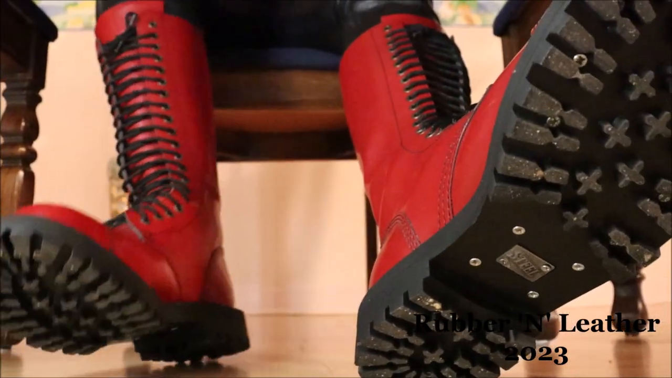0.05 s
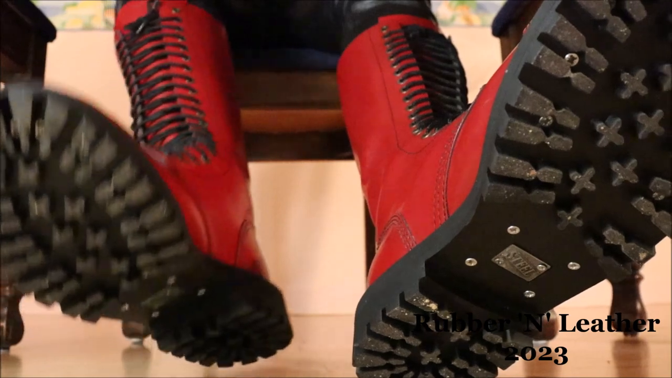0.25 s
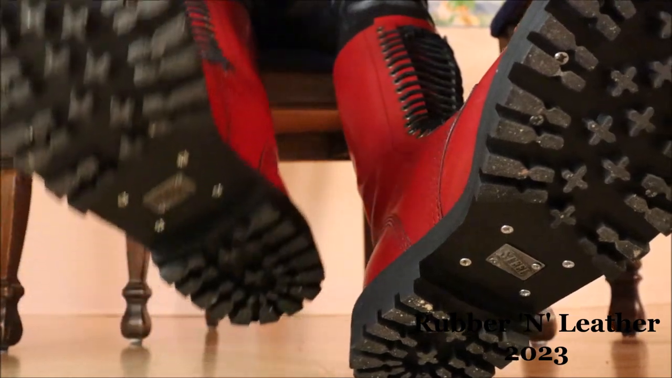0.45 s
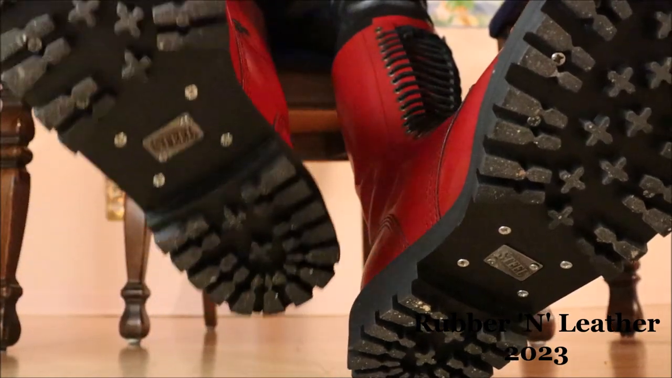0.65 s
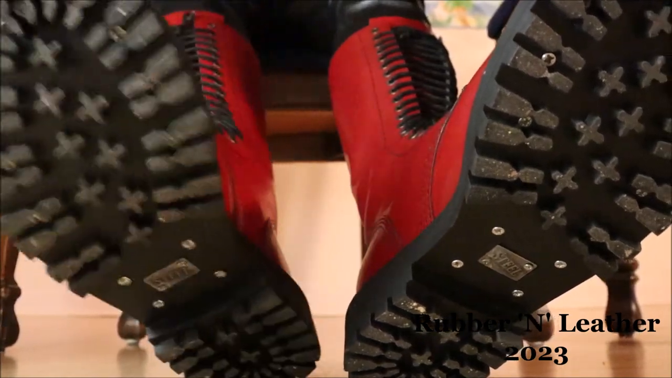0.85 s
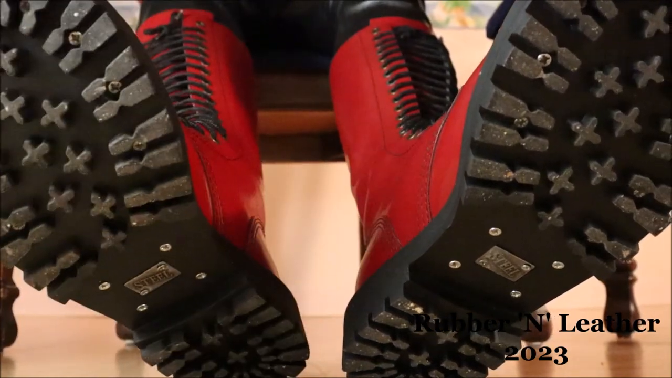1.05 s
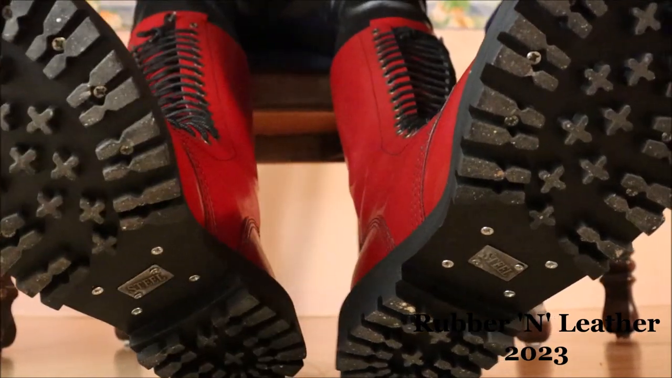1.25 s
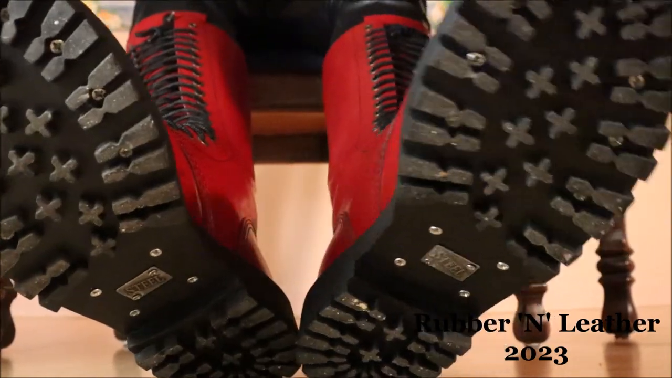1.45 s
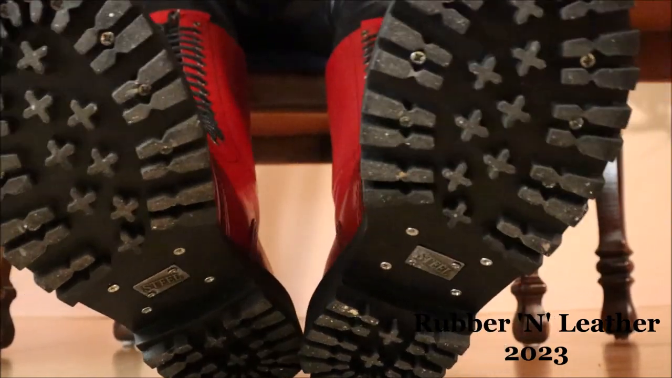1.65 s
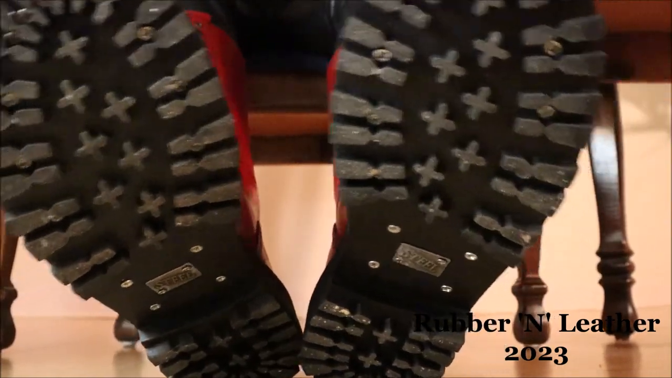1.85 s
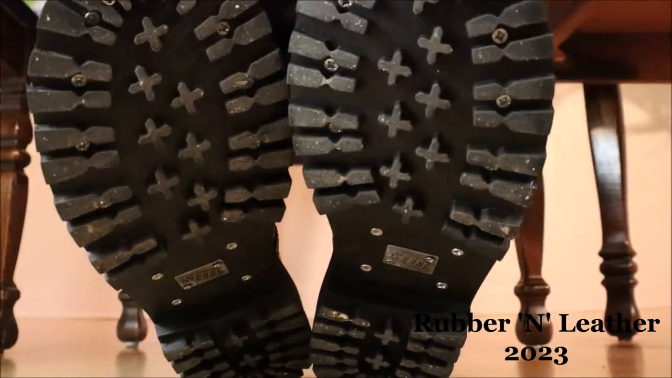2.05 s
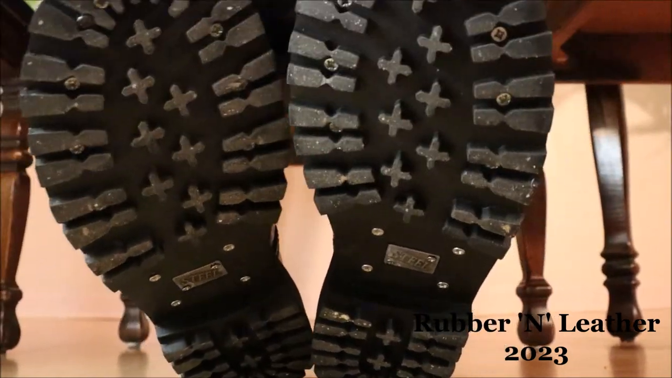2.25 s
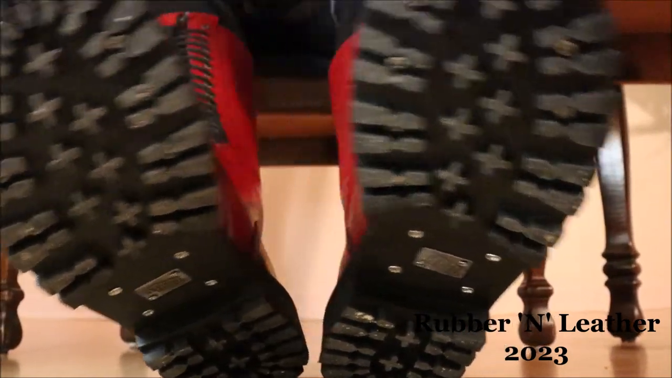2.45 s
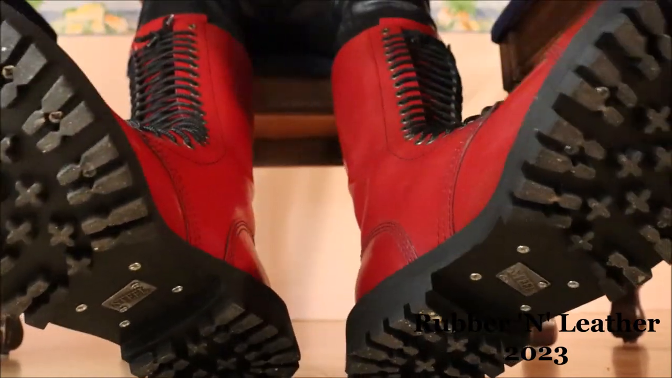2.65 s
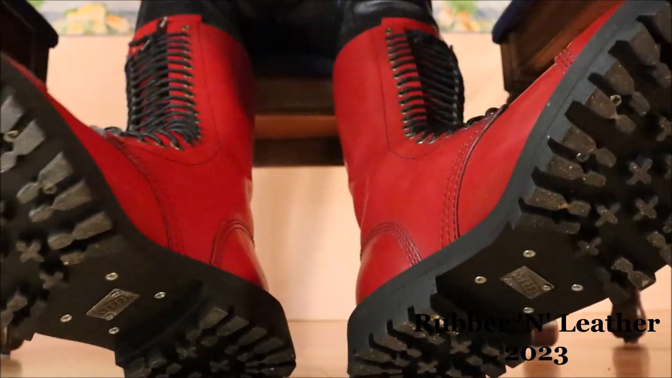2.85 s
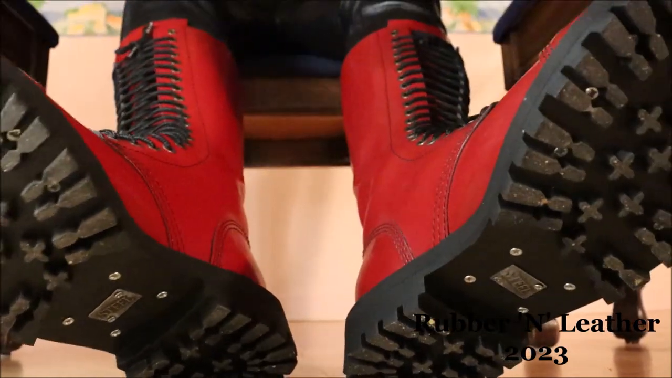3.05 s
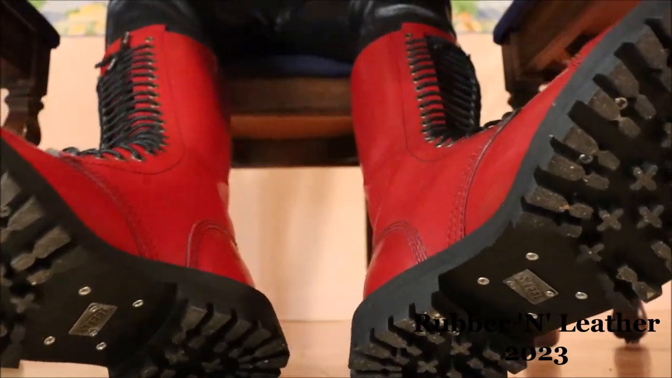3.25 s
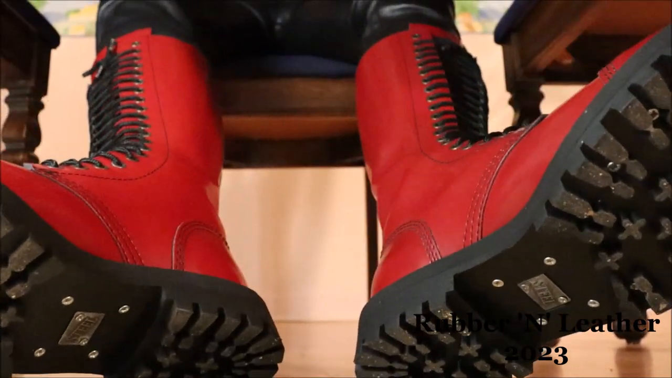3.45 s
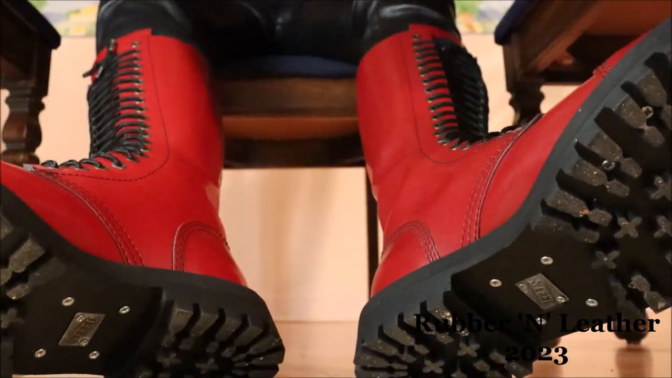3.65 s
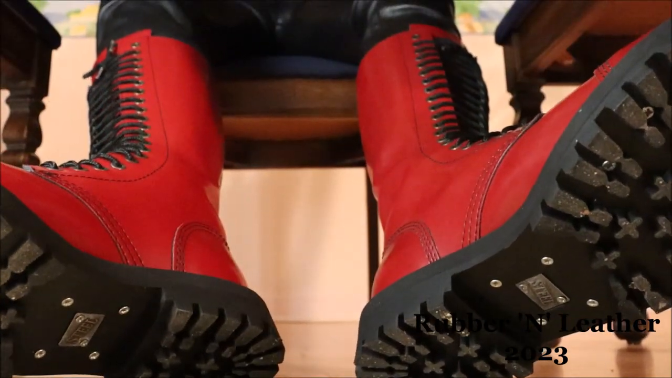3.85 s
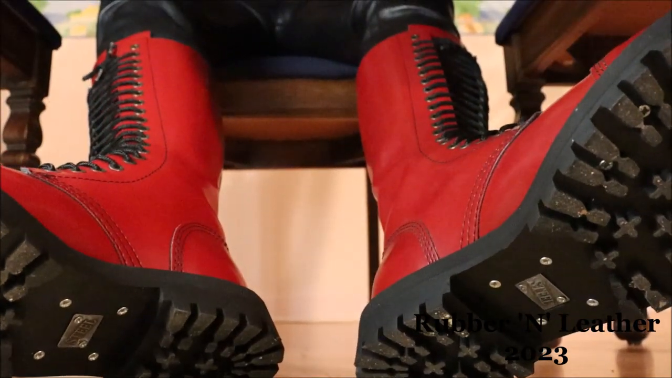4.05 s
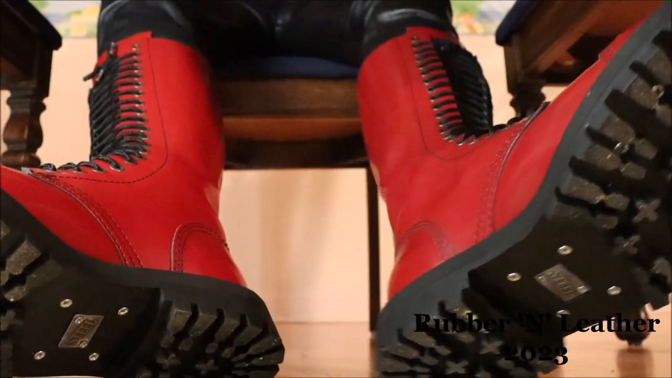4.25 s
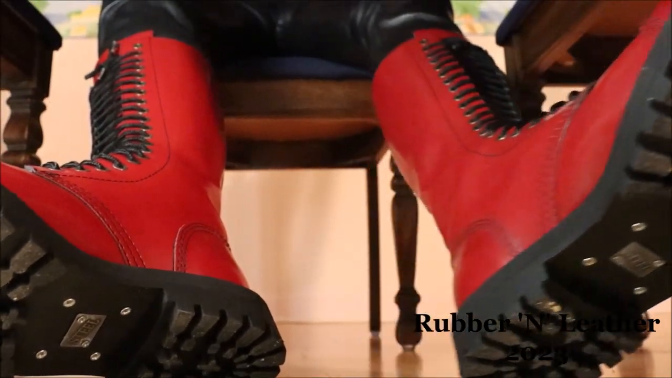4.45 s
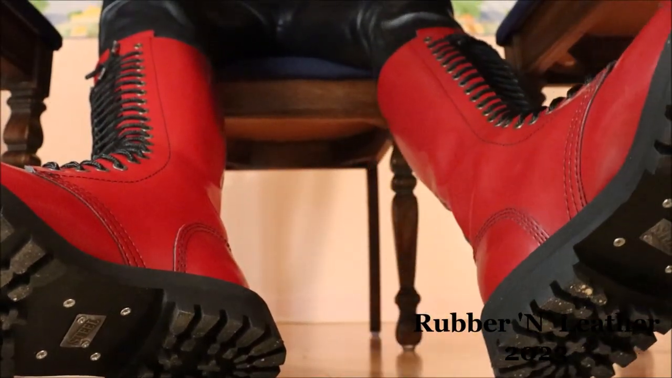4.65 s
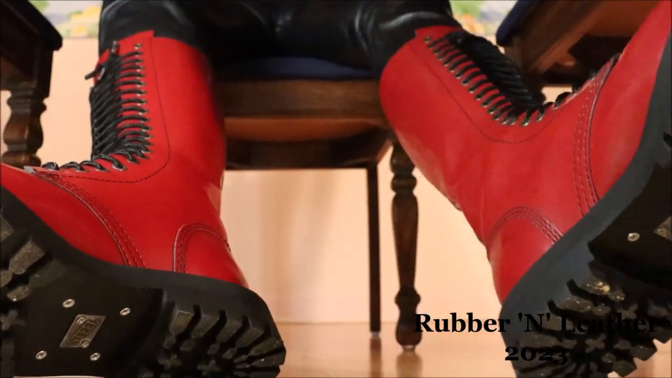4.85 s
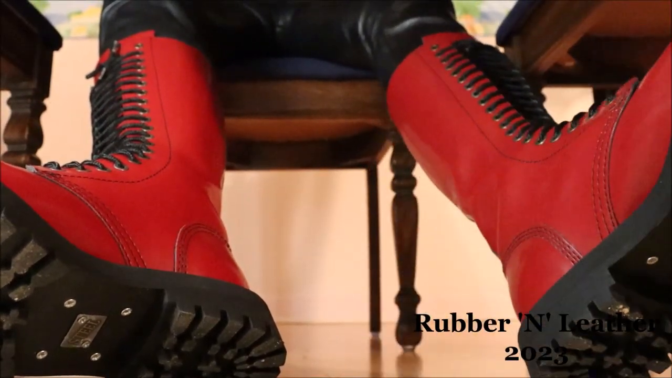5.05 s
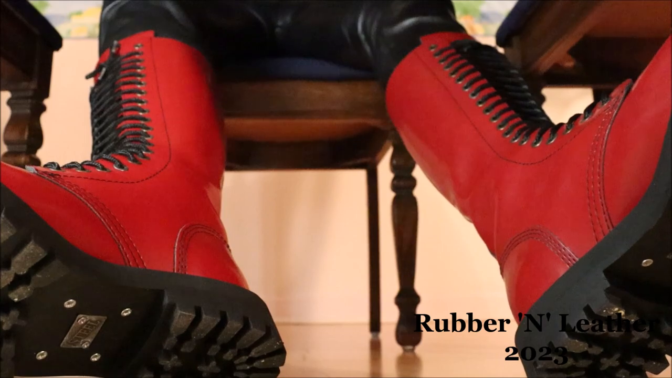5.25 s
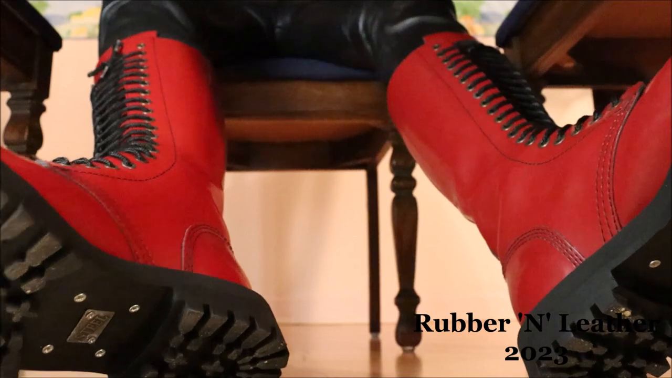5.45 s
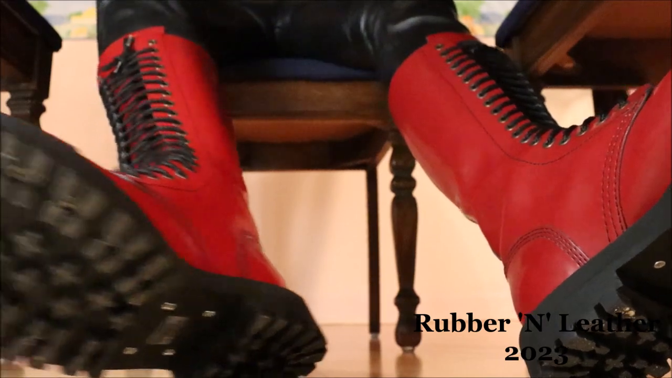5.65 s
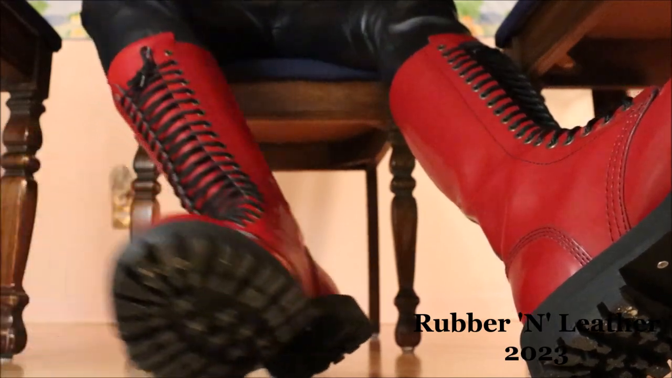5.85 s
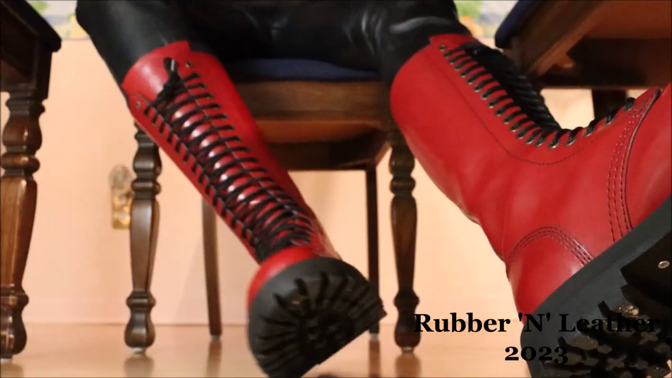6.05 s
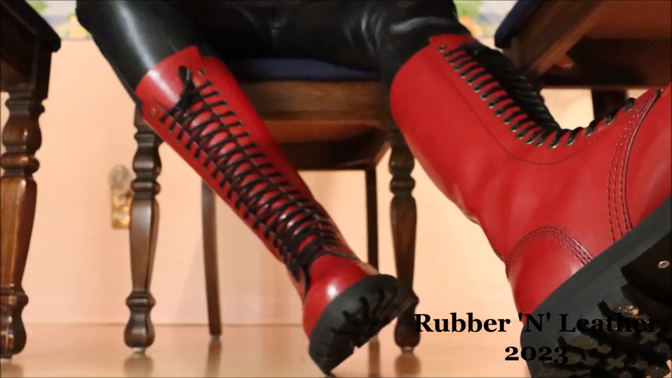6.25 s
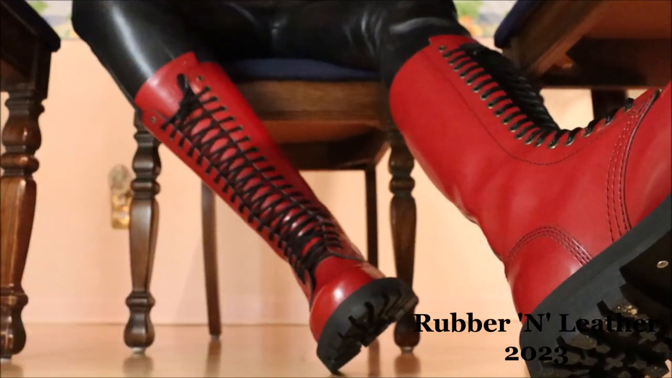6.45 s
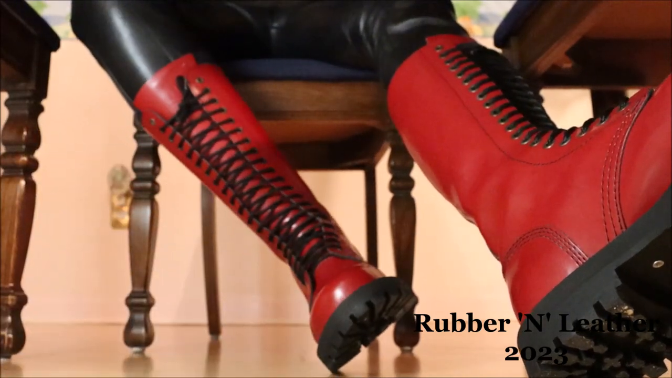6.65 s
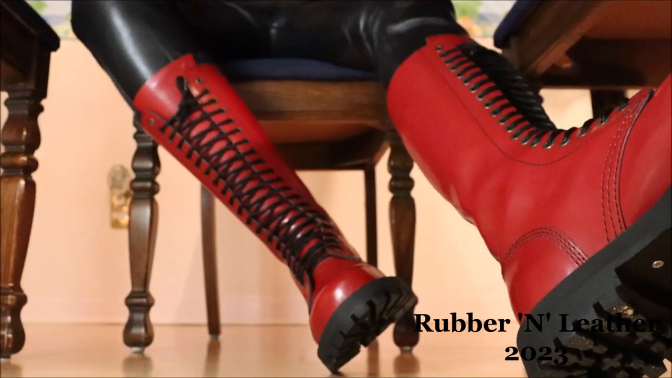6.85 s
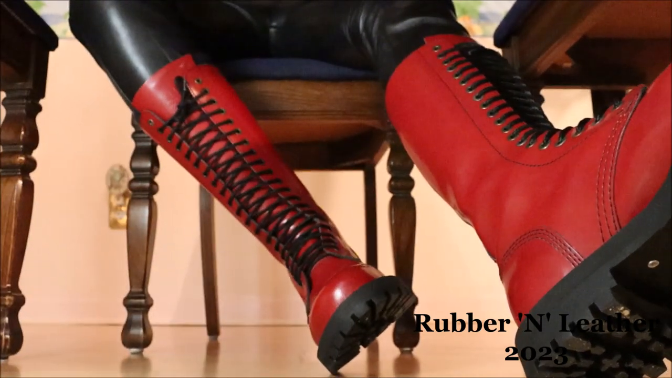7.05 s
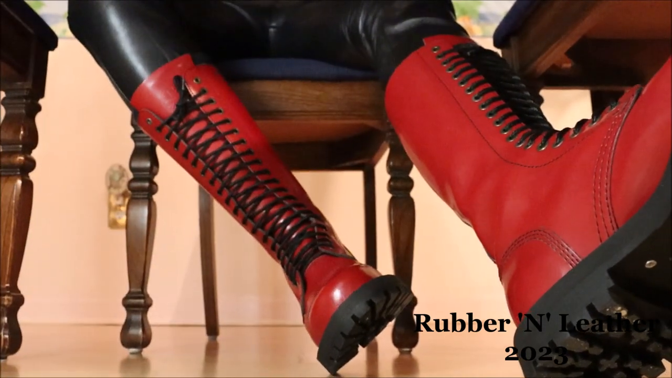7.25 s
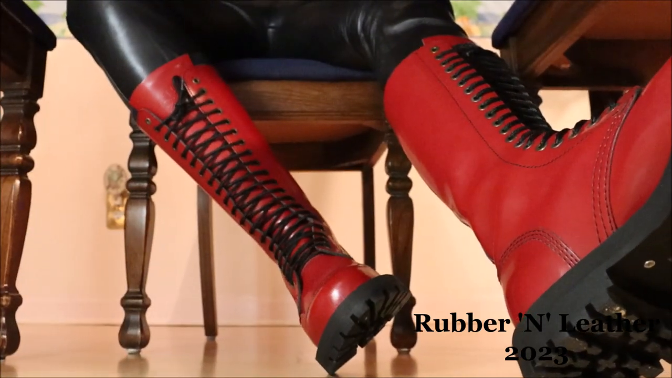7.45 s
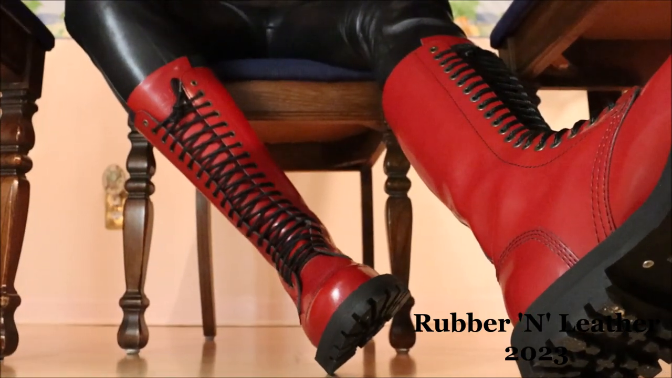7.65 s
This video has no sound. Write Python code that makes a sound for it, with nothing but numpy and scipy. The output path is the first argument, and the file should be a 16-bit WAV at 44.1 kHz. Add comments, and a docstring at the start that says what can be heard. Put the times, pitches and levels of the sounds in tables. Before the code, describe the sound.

Heavy leather boots turn on their heels on wooden boards, close to a small stereo microphone in a room. Rough scraping and leather rustle lead to one hard, hollow heel knock near the first second, followed by crisp ticks. Quiet shifts and soft knocks follow, then a loud harsh scrape with a thud near six seconds, and faint settling ticks over low hiss and hum.

```python
"""Heavy boots turn on their heels on a wooden floor, close to a small stereo microphone, indoors.
Soles, boards and leather slide and rustle: noise shaped stroke by stroke, with added noise bands as rasps.
Heels knock the boards, which ring as decaying modes; cracks and small ticks are noise bursts through resonances.
Knocks and ticks send a short diffuse tail into the room; a faint mains hum and hiss lie beneath."""
import sys
import numpy as np
from scipy import signal
from scipy.fft import rfft, irfft, next_fast_len
from scipy.io import wavfile
from scipy.ndimage import uniform_filter1d, map_coordinates

SR = 44100
rng = np.random.default_rng(int(sys.argv[2]) if len(sys.argv) > 2 else 0)


def output_pcm(signal):
    """Save a mono or channel-first signal as 16-bit PCM at the path in sys.argv[1].

    Samples are clipped to [-1, 1] before scaling.
    """
    pcm = np.clip(np.atleast_2d(signal).T, -1, 1) * 32767
    wavfile.write(sys.argv[1], SR, np.round(pcm).astype(np.int16))


N = 340114  # length in samples
HOP = 128  # step of the short-time spectra, samples


def amp(db):
    """Decibels to gain."""
    return 10 ** (np.asarray(db) / 20)


def unit(x):
    """x at rms 1."""
    return x / np.sqrt(np.mean(np.abs(x) ** 2) + 1e-20)


def along(points, hz):
    """Reads a curve of (hz, value) points on a log frequency axis."""
    point_hz, value = np.transpose(points)
    return np.interp(np.log(hz + 1), np.log(point_hz + 1), value)


def filtered(x, response):
    """x times a complex response of frequency."""
    size = next_fast_len(x.shape[-1] + SR // 2)
    spectrum = rfft(x, size) * response(np.fft.rfftfreq(size, 1 / SR))
    return irfft(spectrum, size)[..., :x.shape[-1]]


def band(x, hz, width):
    """x through one resonance twice, peak 1."""
    y = filtered(x, lambda f: (1j * f * width / (hz * hz - f * f + 1j * f * width)) ** 2)
    return y / np.abs(y).max()


def pair(excitation, alike):
    """Short-time spectra of two channels mixed to the likeness in the table, held between 0 and 1."""
    hz, t, (a, b) = signal.stft(excitation, SR, nperseg=4 * HOP, noverlap=3 * HOP)
    turn = np.arccos(np.clip(along(alike, hz), 0, 1))[:, None] / 2
    left = np.cos(turn) * a + np.sin(turn) * b
    right = np.cos(turn) * a - np.sin(turn) * b
    return hz[:, None], t, np.array([left, right])


def to_samples(spectra):
    """Short-time spectra back to samples."""
    return signal.istft(spectra, SR, nperseg=4 * HOP, noverlap=3 * HOP)[1][:, :N]


def patches(shape, db):
    """Random gain, smooth over some hundred Hz and some ten ms."""
    across_hz = uniform_filter1d(rng.standard_normal(shape), size=3, axis=0)
    field = uniform_filter1d(across_hz, size=10, axis=1)
    return amp(db * unit(field))


def wobble(t, rate):
    """A smooth random curve, rate knots a second."""
    return map_coordinates(rng.standard_normal(int(t[-1] * 60)), [t * rate])


def add(out, start_s, x):
    """Mixes x into out from start_s."""
    part = out[:, round(start_s * SR):][:, :x.shape[1]]
    part += x[:, :part.shape[1]]


def sliding():
    """Dense uneven slips excite sole, boards and leather; the sole's resonance moves as the boot tilts."""
    # likeness of the two ports: hz, left-right likeness (0 to 1)
    alike = [(60, 0.93), (400, 0.91), (1000, 0.56), (2000, 0.55), (4000, 0.43), (8000, 0.24), (15000, 0.13)]
    # balance of the ports: hz, left over right in dB
    leans = [(60, 5), (150, 1), (380, 0), (950, 0), (2380, -3), (5980, -2), (15000, -4.5)]
    # near reflections turn the ports apart: hz, left's lead in radians
    leads = [(300, -0.1), (1700, -0.5), (2240, 1.64), (3000, 1.8), (3600, 0.87), (4390, 1), (5770, 2.5),
             (6900, 0.9), (10300, 2.5), (16000, 1)]
    # steady bands in the scraping sound: centre_hz, width_hz, lift_db
    steady_bands = [(1560, 200, 6.5), (2280, 200, 4), (2860, 130, 5), (3260, 250, 7), (4130, 200, 3)]
    # relative spectra of sole scrape, drag on the boards, leather rustle and fine swish: hz, density in dB
    scrape = [(470, -32), (800, -1.5), (1230, -1), (1330, -1), (1560, -1.5), (2060, 1), (3300, -3),
              (3680, -1.5), (4280, -6), (6000, -52), (7800, -49), (13200, -120)]
    drag = [(29, -46), (50, -19.5), (210, 6.5), (236, 6), (399, -1), (603, 1.5), (886, -5.5), (1340, -9),
            (1500, -6), (1950, -95.5), (3300, -120)]
    rustle = [(2650, -22), (4500, -2.5), (4700, -5), (5610, -5.5), (6980, -8.5), (8050, -12), (10500, -23),
              (13600, -30), (22000, -120)]
    swish = [(5000, -48), (8500, -7), (10700, -6), (12800, -5), (13900, -4.5), (16000, -5.5)]

    slip_size = amp(4 * rng.standard_normal(N)) * (rng.random(N) < .2)  # one sample in five slips
    slip_gain = unit(np.hypot(.9, unit(slip_size)))
    hz, t, z = pair(rng.standard_normal((2, N)) * slip_gain, alike)
    centre_hz, scrape_db, drag_db, rustle_db, swish_db = strokes(t)

    moving_resonance = np.sqrt(0.32 + 1.42 / (1 + ((hz - centre_hz) / 350) ** 2))
    lift_db = sum(db / (1 + (2 * (hz - c) / width) ** 2) for c, width, db in steady_bands)
    sole = amp(along(scrape, hz)) * moving_resonance * amp(lift_db)
    sole /= np.sqrt(np.mean(sole ** 2, axis=0))
    power = (amp(scrape_db) * sole) ** 2
    for db, spectrum in ((drag_db, drag), (rustle_db, rustle), (swish_db, swish)):
        power += (amp(db) * unit(amp(along(spectrum, hz)))) ** 2

    strength = np.sqrt(power * patches(power.shape, db=3.5) + rasps(hz, t))
    half = amp(along(leans, hz) / 2) * np.exp(.5j * along(leads, hz))  # each port takes half of the offset
    return to_samples(z * strength * np.array([half, 1 / half]))


def strokes(t):
    """Sole resonance and the levels of the four layers; each stroke rises, holds and falls."""
    # slides, turns and the rumble after the big knock: full_strength_from_s, rise_s, hold_s, fall_s,
    # sole_resonance_hz, then scrape_db, drag_db, rustle_db, swish_db (before the uneven grip)
    stroke_rows = [(0, .05, .21, 0.069, 2700, -46, -53.5, -55.5, -57.5),
                   (.3, .15, .05, .15, 1640, -56, -50.5, -67, -60),
                   (0.383, 0.094, 0.12, 0.23, 2380, -48.5, -51.5, -47.5, -53.5),
                   (0.591, 0.095, 0.15, 0.15, 1750, -44.5, -47.5, -49, -54),
                   (0.804, 0.082, 0.077, 0.11, 1900, -48.5, -50, -52, -59),
                   (0.928, 0.095, 0.15, 0.35, 2220, -58, -47, -86, -75),
                   (1.312, 0.13, 0.027, 0.095, 2010, -59.5, -57, -67, -86),
                   (1.55, .13, 0.016, .24, 1780, -55.5, -53, -65, -68),
                   (1.955, 0.13, 0.066, 0.23, 2000, -57.5, -54.5, -66, -67),
                   (2.515, 0.12, 0.27, 0.14, 1840, -58.5, -58, -66.5, -67),
                   (2.983, 0.22, 0.045, 0.43, 1650, -58, -61.5, -66, -66),
                   (3.292, 0.3, 0.072, .15, 1920, -60.5, -57.5, -65, -64),
                   (3.46, 0.093, .04, 0.1, 1620, -60, -50.5, -66, -67),
                   (3.94, 0.066, 0.014, 0.17, 1710, -57, -62, -76, -72),
                   (4.3, 0.11, .13, 0.071, 3300, -54, -58, -59.5, -60.5),
                   (4.5, 0.18, 0.036, 0.23, 1900, -56.5, -56, -69, -67),
                   (4.806, 0.077, 0.14, 0.12, 1870, -62, -65.5, -69, -69),
                   (5.256, 0.1, 0.016, 0.059, 1700, -69, -68, -75, -80),
                   (5.62, 0.033, .07, 0.14, 2520, -60, -52, -62, -60),
                   (5.76, 0.15, 0.41, 0.19, 3080, -38, -50, -48.5, -55.5),
                   (5.999, 0.037, 0.028, .06, 2950, -36.5, -44, -54, -61),
                   (6.267, 0.078, 0.067, 0.14, 2750, -42, -51, -54.5, -53.5),
                   (6.531, 0.2, 0.039, 0.12, 1830, -53.5, -49, -62.5, -64),
                   (7.04, 0.23, 0.12, 0.23, 1670, -61.5, -63.5, -68, -71),
                   (7.308, 0.2, 0.13, 0.25, 1850, -66, -63, -71, -70),
                   (7.705, 0.097, .1, .1, 1890, -48.5, -56.5, -61, -62)]
    # the boots never lie quite still: sole_resonance_hz, scrape_db, drag_db, rustle_db, swish_db
    resting = (2000, -72, -67.5, -74.5, -72)
    fade_db = 15  # drop over the rise time and over the fall time, in dB
    grip_db, grip_rate = 1.34, 30  # uneven grip: level swing in dB, knots a second
    tilt_share, tilt_rate = 0.069, 12  # wander of the resonance: share (log), knots a second

    rows = np.array(stroke_rows)
    start, rise, hold, fall = rows[:, :4].T[:, :, None]
    before = np.maximum(start - t, 0) / rise
    after = np.maximum(t - start - hold, 0) / fall
    shape_db = -fade_db * (before + after)
    power = amp(2 * (rows[:, 5:].T[:, :, None] + shape_db))
    rest = amp(2 * np.array(resting[1:]))
    total = power.sum(axis=1) + rest[:, None]
    # the resonance follows whichever stroke scrapes loudest
    centre_hz = (rows[:, 4] @ power[0] + resting[0] * rest[0]) / total[0]
    levels_db = 10 * np.log10(total) + grip_db * wobble(t, grip_rate)
    return centre_hz * np.exp(tilt_share * wobble(t, tilt_rate)), *levels_db


def rasps(hz, t):
    """Power of a lug or seam under load: noise bands that start within 5 ms and stop within some ms."""
    # narrow or broad noise bands, steady or gliding, brief or held through a slide:
    # start_s, end_s, first_hz, last_hz, width_hz, level_db,
    # left over right in dB (ahead of the balance of all sliding)
    rasp_rows = [(0.596, 0.747, 1740, 1700, 490, -42.5, 1.5), (.75, 0.86, 1700, 1700, 500, -50.5, 1.5),
                 (5.8, 6.37, 6900, 7100, 1100, -56.5, -1), (0.58, 0.772, 2900, 2920, 620, -44.5, 1),
                 (2.03, 2.404, 2330, 2080, 260, -64.5, 7), (2.943, 3.056, 1600, 1660, 400, -55, 0),
                 (2.94, 3.054, 5300, 2400, 2500, -56.5, 0), (3.46, 3.485, 2000, 1300, 190, -53, 0),
                 (5.903, 5.936, 3500, 3000, 1900, -40, -11), (3.91, 3.95, 1600, 1200, 3200, -52.5, -1)]
    power = 0
    for start, end, first_hz, last_hz, width, db, pan_db in rasp_rows:
        centre = np.interp(t, [start, end], [first_hz, last_hz])
        shape = 1 / (1 + (2 * (hz - centre) / width) ** 4)
        opening = np.clip((t - start) / 0.0046, 0, 1)
        closing = np.clip((end - t) / 0.019 + 1, 0, 1)
        sides = amp([[[pan_db]], [[-pan_db]]])  # on power: half of pan_db at each port
        power = power + sides * (amp(db) * opening * closing) ** 2 * shape / shape.mean(axis=0)
    return power


def knocks():
    """The patch under the heel rings briefly and sets the joists going; only a hard edge wakes the upper modes."""
    # heel on boards: start_s, direct peak_db (mean of the ports), heel_hz,
    # then boom_db of the joists, hardness_db of the edge, weight_db of the deep floor
    knock_rows = [(0.921, -6, 293, -6.5, -12, -25), (1.474, -34, 134.6, -11.5, -18, -22.5),
                  (1.648, -22, 199, -6.5, -12.5, -25), (2.054, -32, 115, -10.5, -9.5, -20.5),
                  (2.31, -46.5, 480, -1, -3, -19), (2.461, -45, 620, -9, -6, -28),
                  (2.505, -42, 163, -1, -6, -25), (3.322, -41.5, 151, -2, -11, -24),
                  (3.412, -36.5, 520, 2.5, -2, -15), (3.511, -38, 240, -9, -22, -44),
                  (3.904, -40, 160, 2, -4.5, -23), (4.443, -39.5, 628, -28, -10, -33),
                  (4.575, -39.5, 134, 3, -2, -16), (5.09, -25, 201, -10, -28, -23),
                  (6.001, -23.5, 147, -1, -4.5, -18), (6.46, -39, 228, -14, -21, -40),
                  (6.497, -36, 244, -6.5, -14, -33), (6.525, -36, 229, -9, -4, -20.5),
                  (7.003, -49.5, 605, -6, 3, -23), (7.054, -43.5, 240, -6, -12, -34),
                  (7.133, -36, 252, -11, -7, -37), (7.359, -46, 460, -15, -7, -28),
                  (7.38, -38, 170, 0, -4, -38), (7.671, -40, 167, 9.5, -12, -5)]
    # modes of the struck plank, of the joists and of the whole floor: hz, level_db, t60_s
    plank = [(504, 7.5, 0.041), (642, -5, 0.059), (835, -18, 0.046), (945, -14, 0.032), (1413, -11, 0.017),
             (417.7, -11, 0.36), (504, -14, 0.29), (608, -20, 0.57)]
    joist_modes = [(127, -5.5, 0.53), (172, -1.5, 0.3), (213.5, -5, 0.27), (263.6, -2, 0.17),
                   (321, -10, 0.4)]
    floor_modes = [(38.4, 3.9, 0.77), (69.5, 15.2, 0.3), (98.4, 8.4, 0.56)]

    out, t = np.zeros((2, N)), np.arange(int(.6 * SR)) / SR
    rise = 1 - np.exp(-t / 0.00031)
    for start, db, heel_hz, boom_db, hard_db, weight_db in knock_rows:
        heel = ring([(heel_hz, 0, .07)], t, loose=0)
        edge = amp(hard_db) * ring(plank, t, loose=0.0016)
        joists = amp(boom_db) * ring(joist_modes, t, loose=0.0018) * (1 - np.exp(-t / 0.00044))
        deep = amp(weight_db) * ring(floor_modes, t, loose=0.002) * (1 - np.exp(-t / 0.0084))
        knock = rise * (heel + edge + joists + deep)
        gain = amp(db) / np.abs(knock).max()
        # the knock starts 1.5 ms after its time; the input to its room tail does not
        add(out, start + 0.00147, gain * knock * amp([[.3], [-.3]]))
        add(out, start, amp(-10.0) * room(gain * rise * (heel + edge)))
    return out


def ring(modes, t, loose):
    """Decaying modes of alternating sign at new strengths; loose boards make their phase wander."""
    wander = loose * np.cumsum(rng.standard_normal((len(modes), len(t))), axis=1)
    spot_db = 1.5 * rng.standard_normal(len(modes))
    total = np.zeros(len(t))
    for k, (hz, db, t60) in enumerate(modes):
        decay = amp(db + spot_db[k] - 60 * t / t60)
        total -= (-1) ** k * decay * np.sin(2 * np.pi * hz * t + np.sqrt(hz) * wander[k])
    return total


def ticks():
    """A spike and a dying rasp, shared among three broad resonances of boot and board."""
    # cracks of the knocks, and small ticks of boots and boards: start_s, peak_db of the centre band,
    # centre_hz, t60_s, left over right in dB, thump_db and fizz_db over the centre band
    tick_rows = [(.825, -37, 4000, .02, 0, -5, -21), (.857, -34, 5500, 0.01, -8, -15, -14),
                 (0.9197, -18, 1770, 0.034, -5.5, -5.5, -20), (1.143, -24.5, 4000, 0.012, -5.5, -16, -19),
                 (1.1605, -34, 3430, 0.024, -10, -26, -26), (1.2265, -40, 2600, 0.048, 5, -12, -3),
                 (1.2562, -26.5, 3700, 0.019, -5, -31, -11), (1.476, -46, 1500, .02, -1.5, 6, -13),
                 (1.484, -32, 2770, 0.027, -3, -2.5, -2.5), (1.6476, -53, 1410, .033, -2, 18.5, -15),
                 (1.825, -59.5, 2000, 0.03, 1, 17.5, -9), (2.0562, -54.5, 2020, .026, -3, 17, -11),
                 (2.4955, -30.5, 2720, .015, -1.5, -7, -21), (2.771, -44.5, 1450, .043, -1, 5, -15),
                 (2.814, -39.5, 1310, 0.019, -2.5, -17, -28), (2.8673, -40.5, 2080, .026, -1, -15, -22),
                 (2.939, -32, 2800, 0.019, -1, -14, -32), (3.326, -50, 1200, 0.039, -1.5, 8, -18),
                 (3.414, -47, 1300, 0.033, -1.5, 6, -18), (3.459, -36, 1420, 0.083, -2, 0, -23),
                 (3.907, -31, 1500, 0.081, -2, -6, -20), (4.2278, -44.5, 2440, 0.049, 2, -18, -19),
                 (4.4457, -35, 2800, .053, -5, -4, -17), (4.798, -48, 2090, .03, -2, 3, -13),
                 (5.0923, -48, 2780, .033, -17, -1, -12), (6.3567, -33, 2410, 0.055, -2, -4, -13),
                 (6.4027, -35, 1160, 0.067, -3, 0, -4), (6.4455, -38, 1970, 0.029, -1.5, -1, 0.5),
                 (6.473, -38, 2980, 0.031, -2.5, 0, -2), (6.527, -48, 1380, .03, 1.5, 16, -21),
                 (6.769, -34.5, 1940, 0.028, -1, -5, -11), (6.948, -48, 2470, .03, -3, -21, -7),
                 (7.005, -42.5, 3070, .03, -5, -0.5, -13), (7.052, -44.5, 2080, 0.054, 0, -16, -11),
                 (7.1342, -43, 1510, 0.04, 1, 6.5, -21), (7.19, -47.5, 1370, 0.024, 4, 4, -23),
                 (7.381, -39.5, 1520, 0.06, -1.5, -2, -27), (7.585, -43, 2190, 0.035, -2, 1.5, -6),
                 (7.642, -52.5, 1780, 0.026, -1.5, 10.5, -5), (7.6729, -35, 1820, 0.044, -3, -1, -12),
                 (7.685, -37, 2100, .034, -3, 1.5, -3)]
    centre_width = 1  # width of the centre resonance over its frequency
    out, t = np.zeros((2, N)), np.arange(SR // 4) / SR
    for start, db, hz, t60, pan_db, thump_db, fizz_db in tick_rows:
        noise = rng.standard_normal((3, len(t)))
        shared_noise = noise[0] + .5 * noise[1:]  # mostly alike at both ports
        burst = shared_noise * (amp(-60 * t / t60) + 1.1 * amp(-60 * t / 0.0022))
        tick = band(burst, hz, centre_width * hz)
        tick += amp(thump_db) * band(burst, 720, 770)
        tick += amp(fizz_db) * band(burst, 9200, 9000)
        tick *= amp(db)
        add(out, start, tick * amp([[pan_db / 2], [-pan_db / 2]]))
        add(out, start, amp(-6.0) * room(tick[0]))
    return out


def room(x):
    """A new diffuse tail; each frequency dies at its own speed, the bass alike at both ports."""
    # decay of the room: hz, t60_s
    decay = [(100, 1), (500, 0.16), (2000, 0.25), (10000, 0.24)]
    # likeness of the tail at the two ports: hz, left-right likeness (0 to 1)
    tail_alike = [(100, 1), (500, 0.68), (1500, 0.67), (4000, 0)]
    hz, t, z = pair(rng.standard_normal((2, SR // 2)), tail_alike)
    tail = to_samples(z * amp(-60 * t / along(decay, hz)))
    delayed = np.pad(x, (150, 0))[None]  # the tail starts 150 samples late
    return signal.fftconvolve(delayed, tail / np.linalg.norm(tail[0]), axes=1)


def background():
    """Microphone hiss with room air, and a wavering mains hum whose phases drift at random."""
    # colour of the hiss: hz, relative density in dB
    hiss_colour = [(15, -31), (25, -14), (108, 4.5), (190, -3), (236, -11), (285, -15.5), (384, 5),
                   (439, -13.5), (1230, -9), (1330, -14.5), (2000, -13.5), (14800, -23), (16000, -18)]
    # likeness of the hiss at the two ports: hz, left-right likeness (below 0 counts as 0)
    hiss_alike = [(60, 0.78), (240, 0.16), (950, -1.64), (3770, -1.5), (15000, -0.44)]
    # hum ahead of the microphone's bass loss: hz, rms level_db
    hum_tones = [(119, -76.5), (239, -68.5)]
    hiss_db = -59  # rms ahead of the microphone's band limits
    hz, t, z = pair(rng.standard_normal((2, N)), hiss_alike)
    hiss = unit(to_samples(z * amp(along(hiss_colour, hz)) * patches(z.shape[1:], db=1.5)))
    drift = np.cumsum(rng.standard_normal((len(hum_tones), N)), axis=1) * 0.009
    hum = np.zeros(N)
    for (tone_hz, db), phase in zip(hum_tones, drift):
        hum += np.sqrt(2) * amp(db) * np.sin(2 * np.pi * tone_hz * np.arange(N) / SR + phase)
    return amp(hiss_db) * hiss + hum


def scene():
    """All sources at the two microphone ports."""
    return knocks() + ticks() + sliding() + background()


def record(dry):
    """The small microphone loses the deep bass; the recorder keeps nothing above its band limit."""
    bass_hz, top_hz = 45, 15880  # corner of the bass loss, band limit
    return filtered(dry, lambda hz: (1j * hz / (1j * hz + bass_hz)) ** 2 * (hz < top_hz))


dry = scene()
out = record(dry)
output_pcm(out)
```